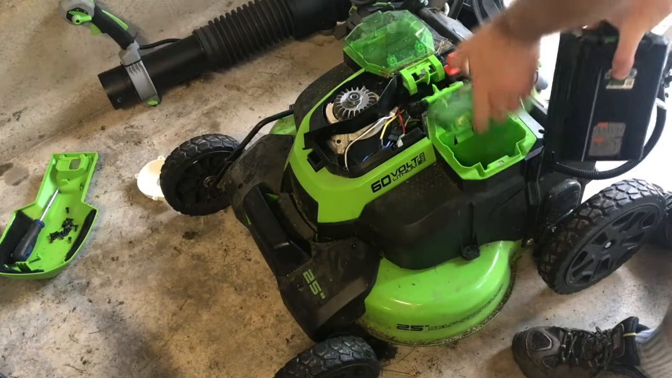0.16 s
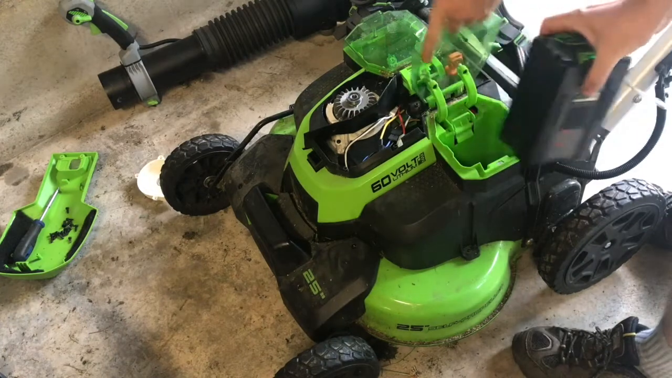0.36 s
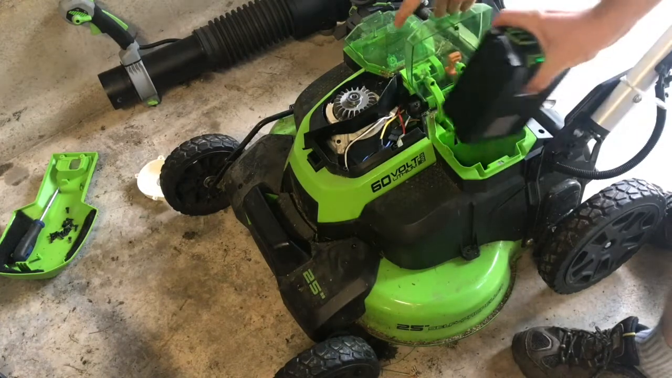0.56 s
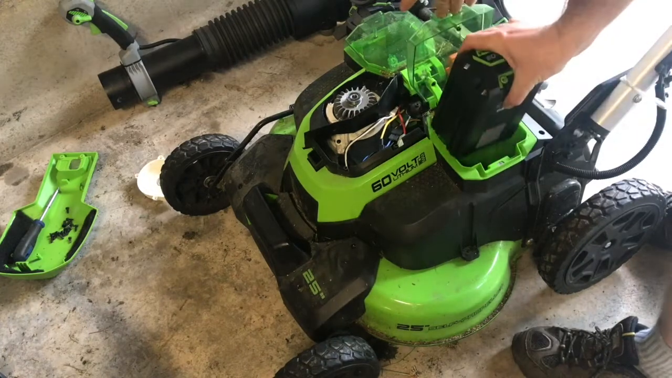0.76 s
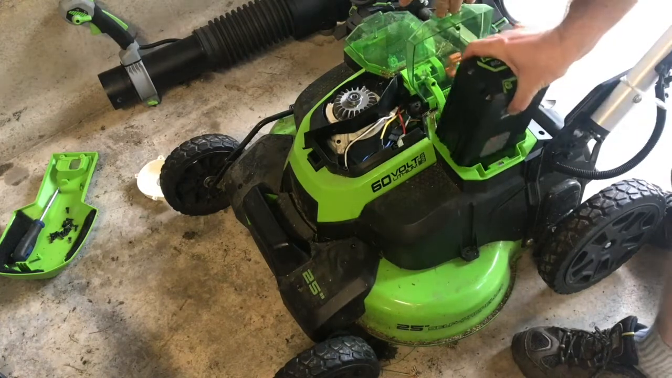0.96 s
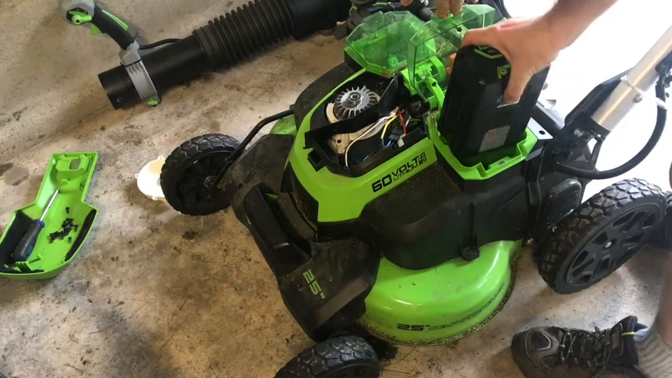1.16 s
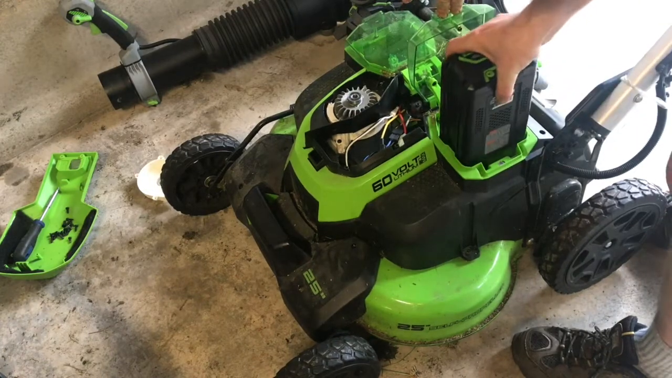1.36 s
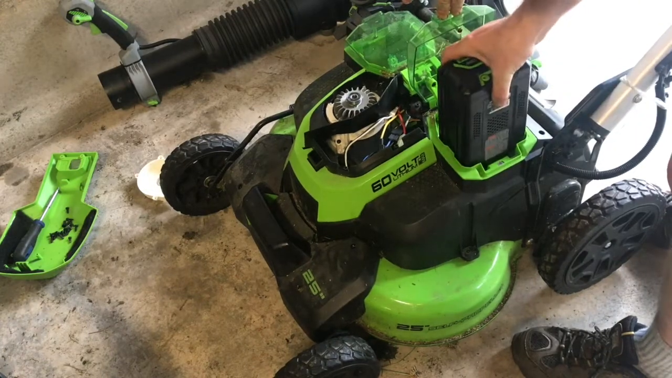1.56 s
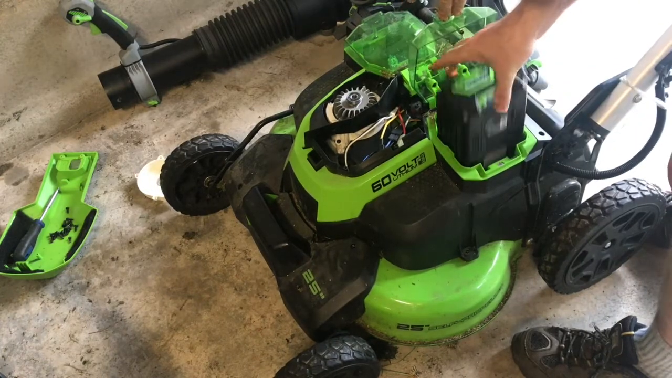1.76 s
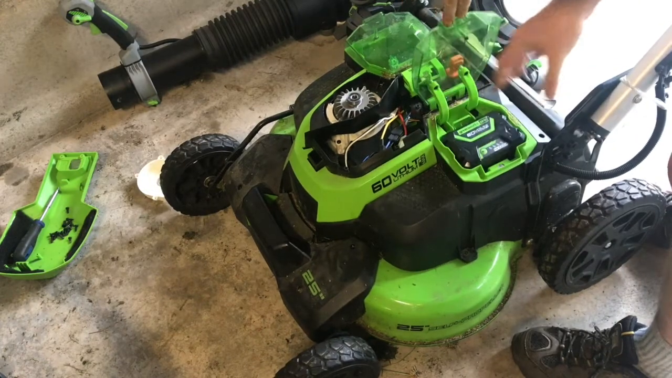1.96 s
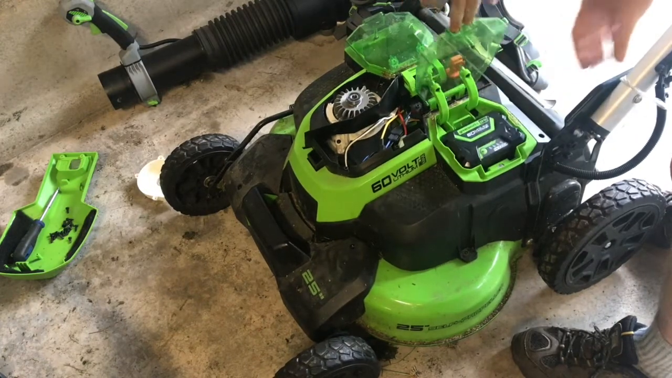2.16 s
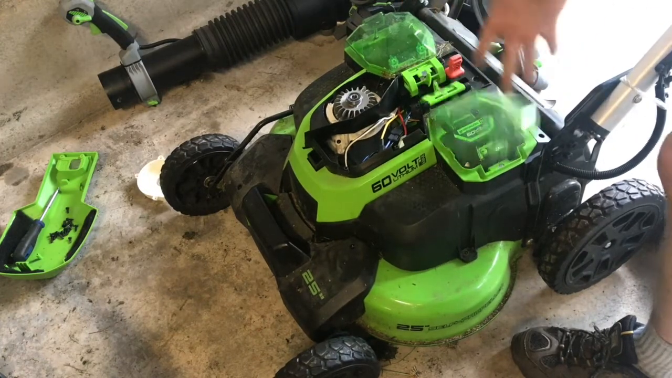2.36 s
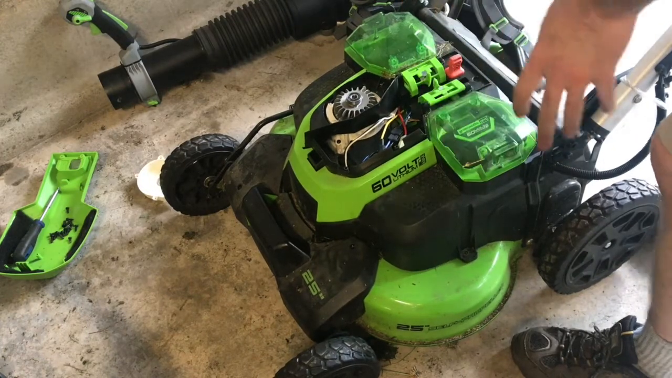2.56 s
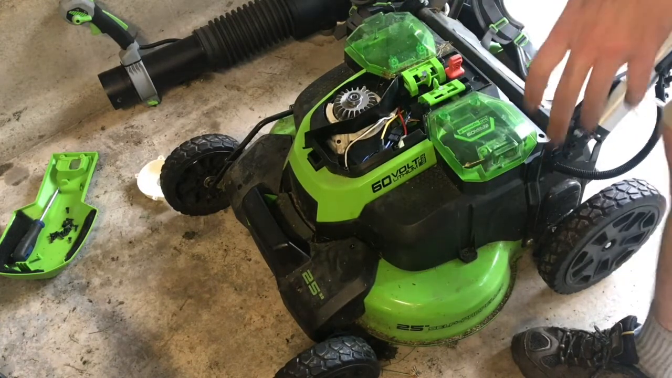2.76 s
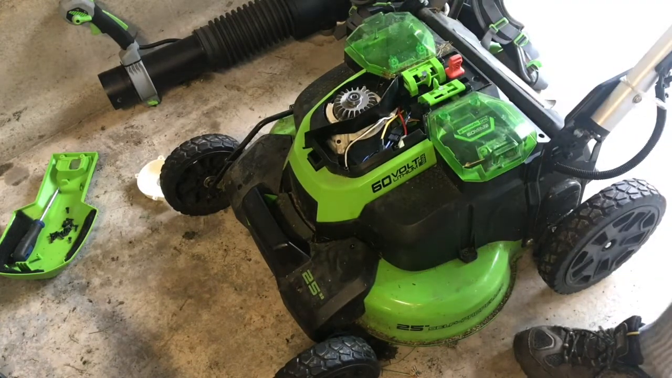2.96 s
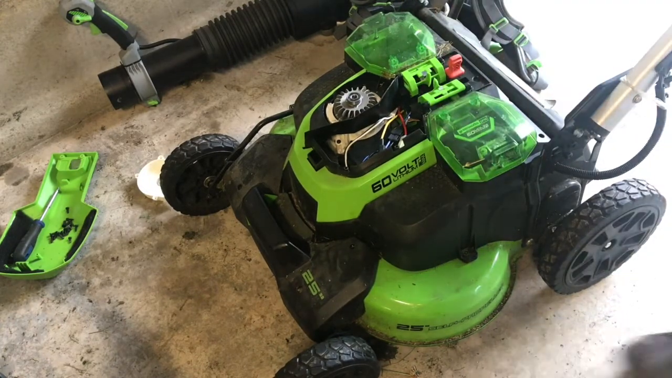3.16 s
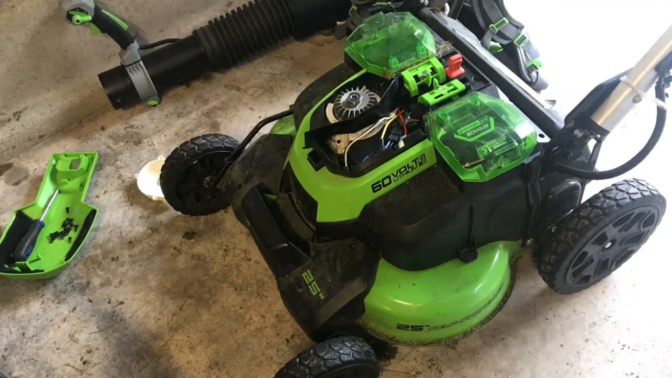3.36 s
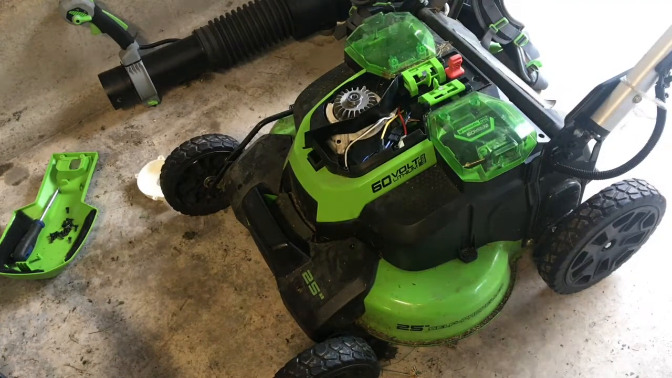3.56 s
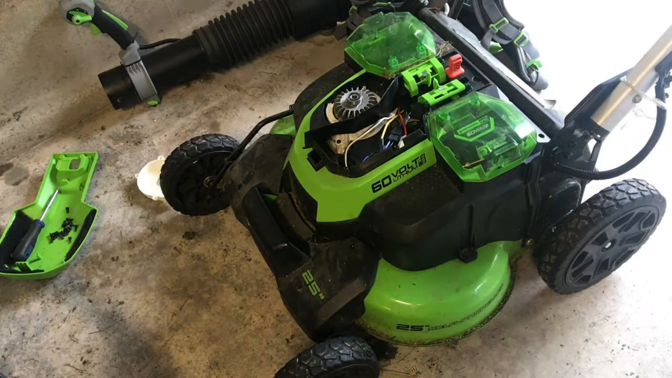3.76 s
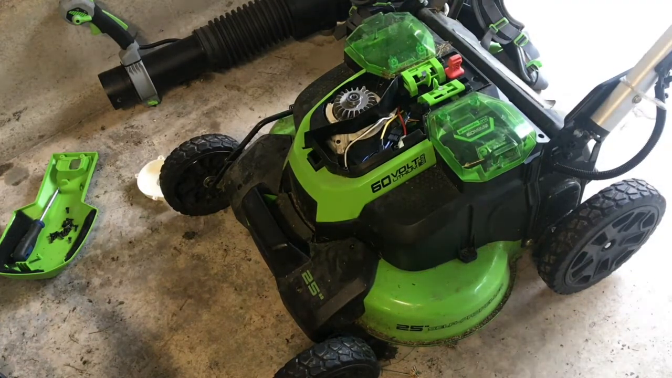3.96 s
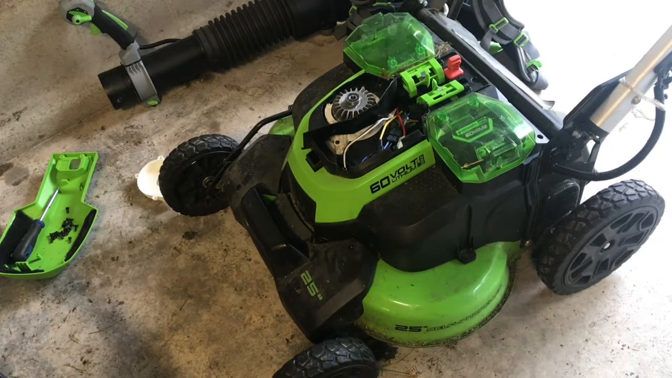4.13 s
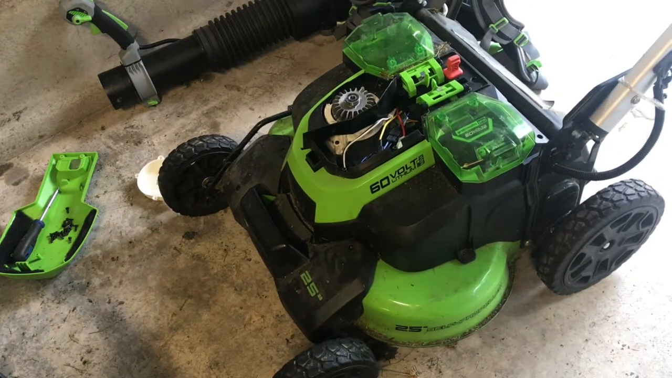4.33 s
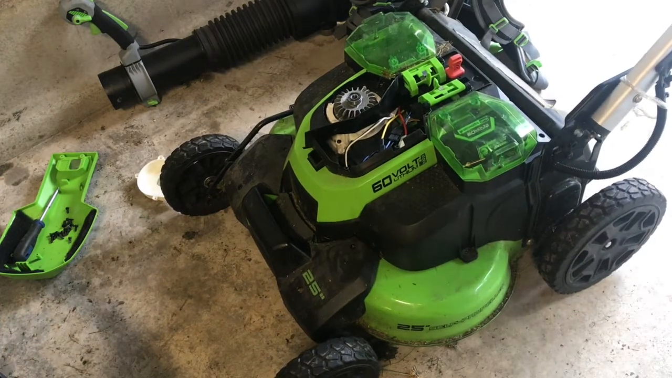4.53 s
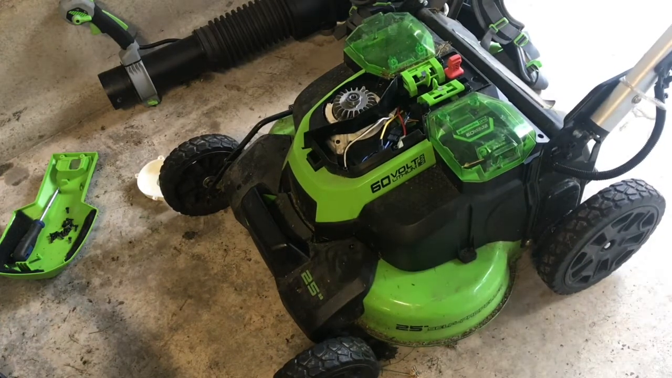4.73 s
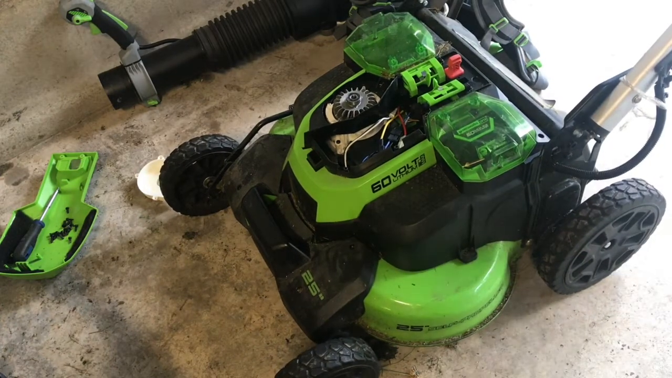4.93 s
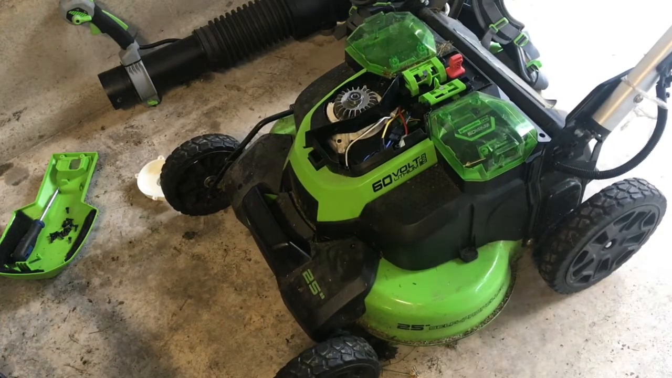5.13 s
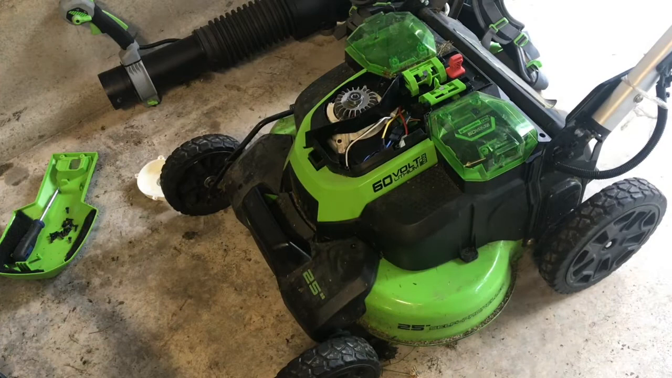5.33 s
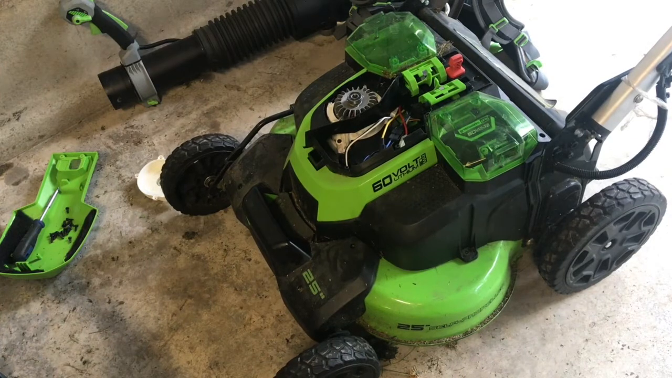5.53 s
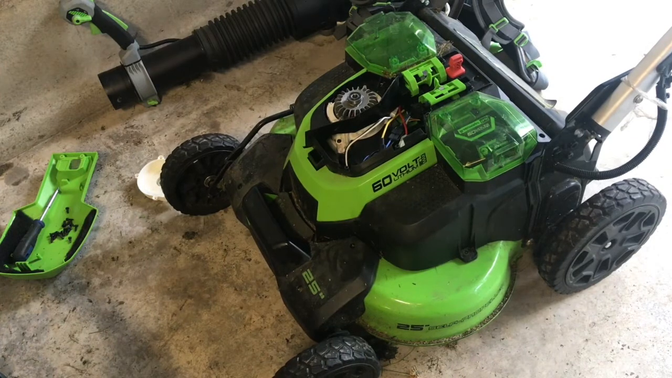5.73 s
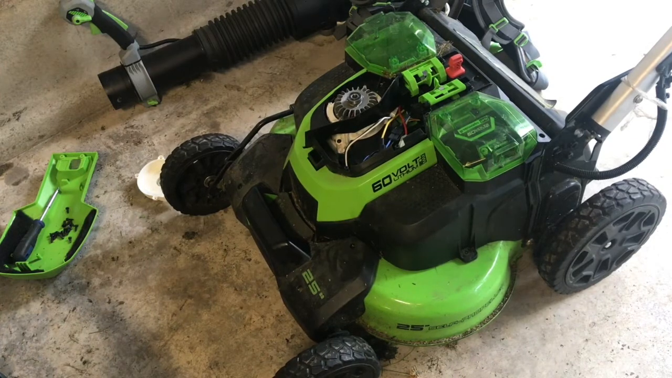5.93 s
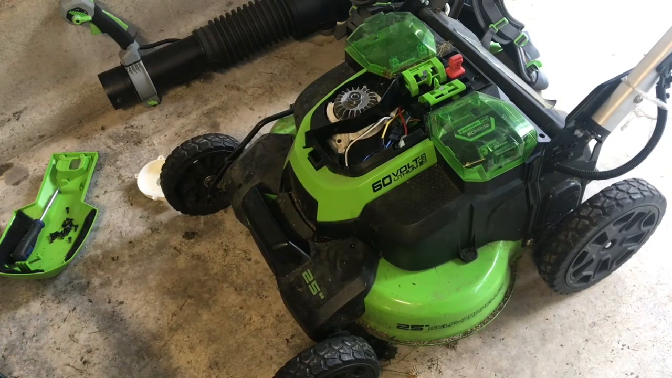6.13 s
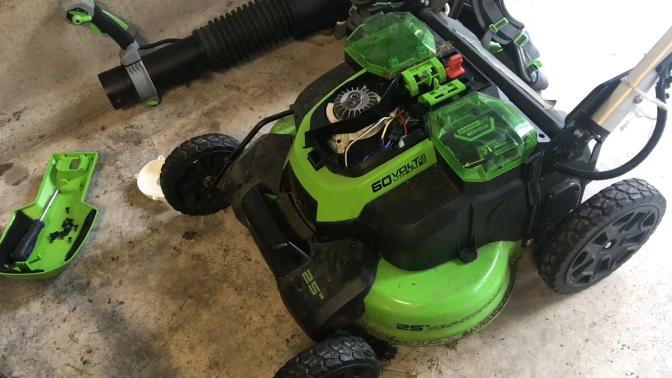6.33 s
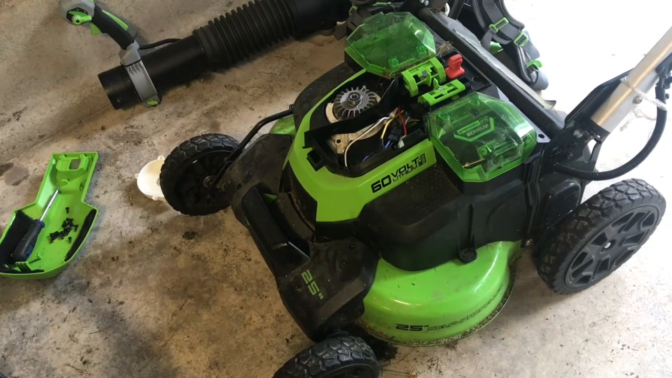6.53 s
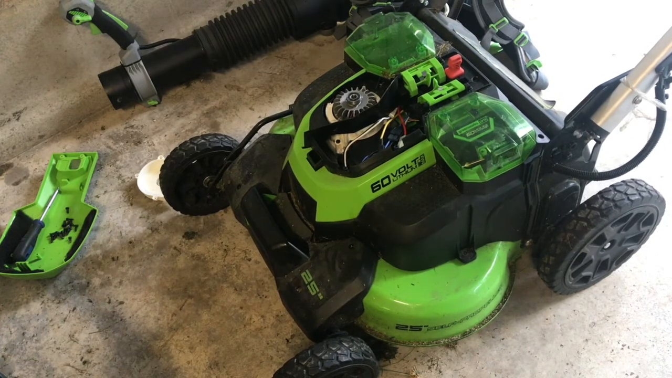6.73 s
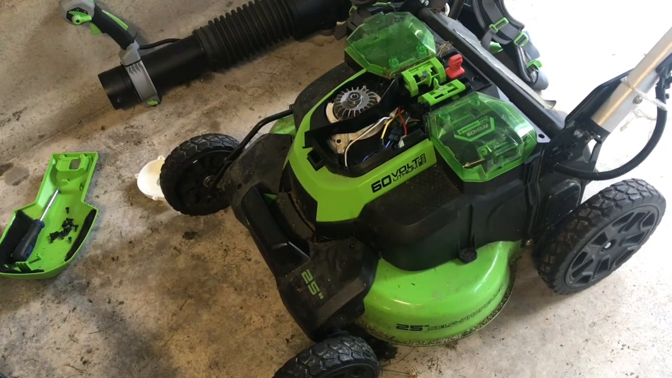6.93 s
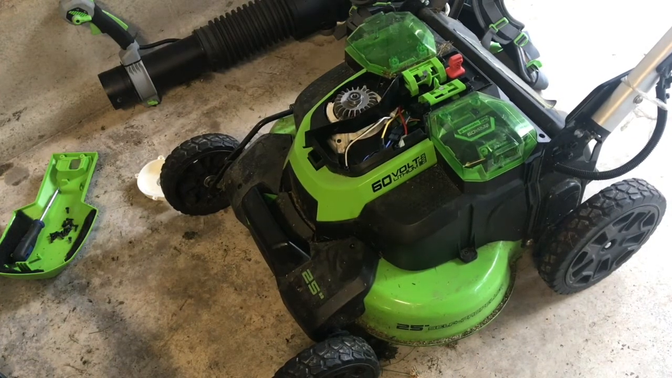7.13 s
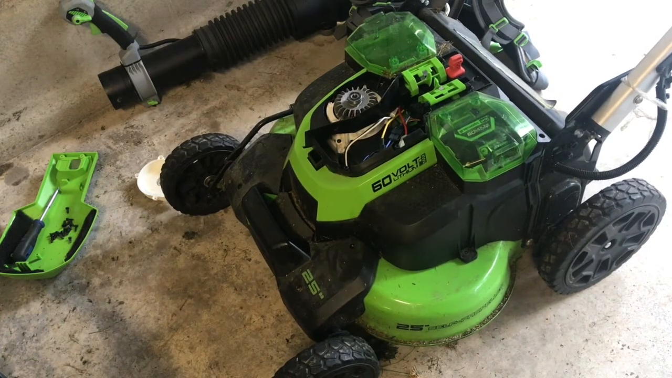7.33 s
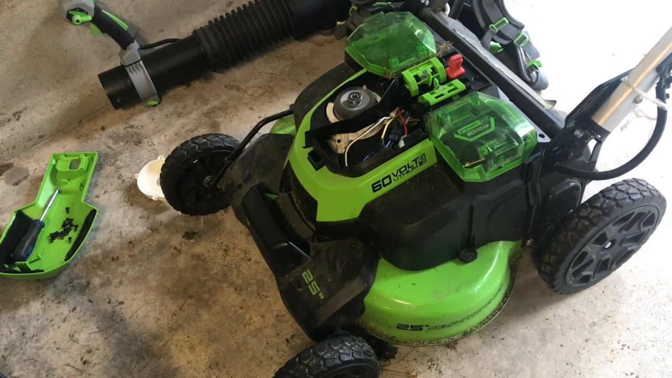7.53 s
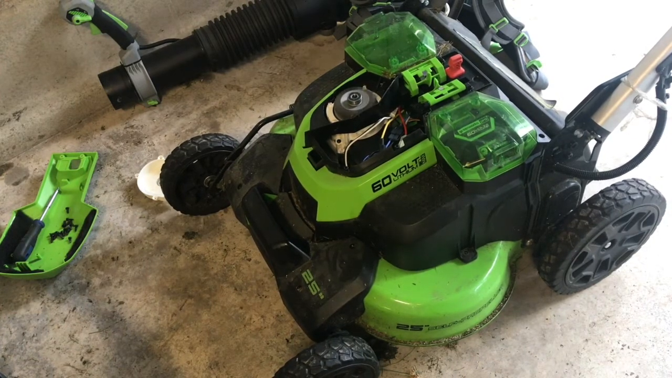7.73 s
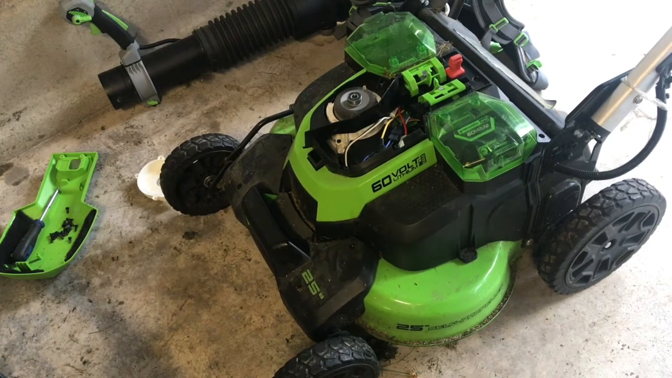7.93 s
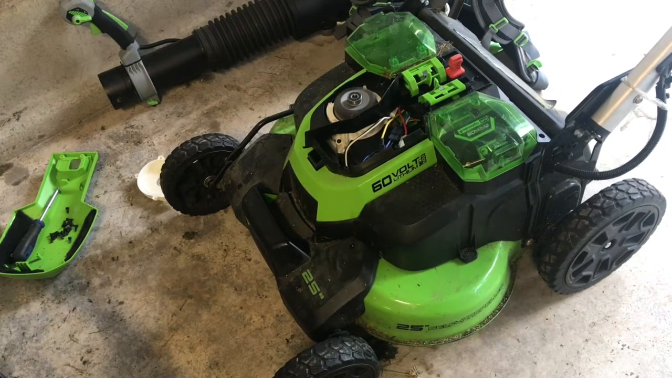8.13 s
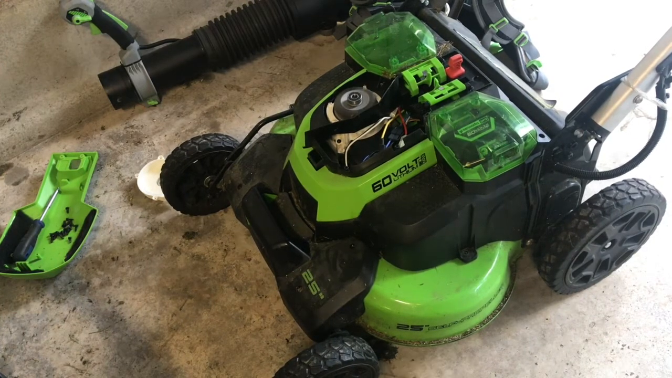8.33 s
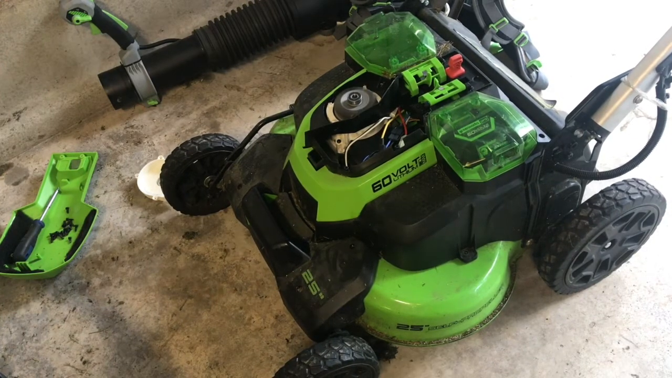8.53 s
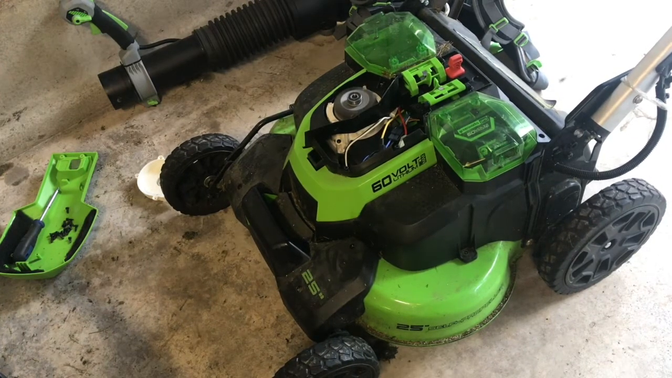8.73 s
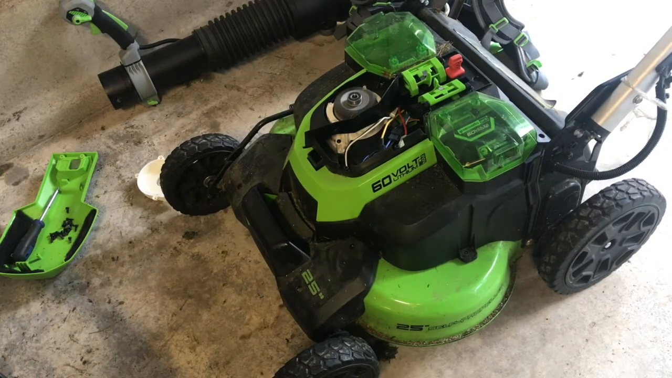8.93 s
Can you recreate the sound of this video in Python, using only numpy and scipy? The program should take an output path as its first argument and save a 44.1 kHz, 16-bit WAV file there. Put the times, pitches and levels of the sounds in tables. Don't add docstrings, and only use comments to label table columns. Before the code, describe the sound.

Close to a cordless mower in a concrete shed, a shoe scrapes grit over faint outdoor rumble. A battery knocks and slides into its plastic bay with hard clacks, then the lid slams. Scuffs and handle clicks follow. The background abruptly becomes quieter, and the motor starts, its loose blade clanking on the deck as roar and hum rise.

```python
import sys
import numpy as np
from scipy import signal
from scipy.fft import rfft, irfft, next_fast_len
from scipy.io import wavfile
from scipy.ndimage import uniform_filter1d

SR = 44100
rng = np.random.default_rng(int(sys.argv[2]) if len(sys.argv) > 2 else 0)


def bounce(signal):
    frames = np.transpose(np.atleast_2d(signal))
    limited = np.clip(frames, -1, 1)
    pcm = np.round(limited * 32767).astype(np.int16)
    wavfile.write(sys.argv[1], SR, pcm)


def ratio_of_db(decibels):
    return 10 ** (np.asarray(decibels, float) / 20)


N = 400869
T = np.arange(N) / SR
LONG = next_fast_len(N)
CHANGE_S, CHANGE_DB = 6.888, -21
TOP_SPEED = 74.5
HEARD_S = 7.74
# pitch in Hz, width in Hz, level in dB over the direct sound.
DECK = [(158, 7.4, 6), (204.5, 10.4, 9), (240.2, 8.9, 11.5), (318.5, 7.6, 10.5), (525, 86, 7.5),
        (641, 44, 0.5), (900, 160, 5.5), (1155, 102, 5.5), (1748, 75, 4), (2120, 54, 0), (3417, 100, 5.5),
        (3860, 110, 4.5), (4460, 40, 8), (6470, 950, -8), (7200, 900, -14.5)]


def evened(x):
    return x / np.sqrt(np.mean(x ** 2) + 1e-20)


def read(points, hz):
    f, value = np.transpose(points)
    return np.interp(np.log(hz + 1), np.log(f + 1), value)


def curves(rows):
    s, *columns = np.transpose(rows)
    gate = uniform_filter1d(1. * ((T > s[0]) & (T < s[-1])), size=400)
    return gate, *(np.interp(T, s, c) for c in columns)


def add(mix, s, sound):
    part = mix[round(s * SR):][:len(sound)]
    part += sound[:len(part)]


def filtered(x, points):
    return irfft(rfft(x, LONG) * ratio_of_db(read(points, np.fft.rfftfreq(LONG, 1 / SR))), LONG)[..., :N]


def coloured(x, points):
    return evened(filtered(x, points))


def resonate(x, hz, width):
    turn = np.exp(2j * np.pi * np.cumsum(hz) / SR)
    r = np.exp(-np.pi * width / SR)
    return 2 * (turn * signal.lfilter([1 - r], [1, -r], x / turn)).real


def body(modes, hz):
    return 1 + sum(ratio_of_db(db) / (1 + 2j * (hz - f) / max(w, 10)) for f, w, db in modes)


def tone(start, end, hz, db, waver_hz, waver_db):
    swell_s, fade_s = 0.11, 0.055
    t = np.arange(0, end - start, 1 / SR)
    drift = [evened(uniform_filter1d(v, size=3000)) for v in rng.standard_normal((2, len(t)))]
    shape = np.clip(np.minimum(t / swell_s, (t[-1] - t) / fade_s), 0, 1)
    level = np.sqrt(2) * shape * ratio_of_db(db + waver_db * drift[0])
    out = np.zeros(N)
    add(out, start, level * np.sin(2 * np.pi * np.cumsum(hz + waver_hz * drift[1]) / SR))
    return out


def knocks(rows, modes, body_db, thud_stretch, wet_db, dull_hz, scatter):
    # time to fall 60 dB, in seconds, for crack, thud, body and fizz.
    shed_t60 = [0.5, 0.6, 0.78, 0.41]
    body_share = 0.51
    size, out = 22050, np.zeros(N)
    t, hz = np.arange(size) / SR, np.fft.rfftfreq(size, 1 / SR)
    edges = [(2500, 7000), (170, 800), (800, 2500), (7000, 15500)]  # crack, thud, body, fizz in Hz
    filters = [signal.butter(2, e, "band", fs=SR, output="sos") for e in edges]
    bands = [signal.sosfreqz(f, hz, fs=SR)[1] for f in filters]
    slows = (1, thud_stretch, 1.2, .8)
    fade = np.clip((t[-1] - t) / .04 - .2, 0, 1)
    tails = [ratio_of_db(wet_db - 60 * t / t60) * (1 - np.exp(-t / 0.0041)) * fade for t60 in shed_t60]
    first_contact = 1.2 * np.exp(-t / 0.0012)
    for s, blow_db, weight_db, edge_db, t60 in rows:
        levels = blow_db + np.array([0, weight_db, body_db + body_share * weight_db, edge_db])
        puffs = rng.standard_normal((4, size))
        grip = 1 + scatter * puffs[0, -1]
        colour = body(modes, hz * grip) / (1 + 1j * hz / dull_hz)
        for db, band, slow, tail, puff in zip(levels, bands, slows, tails, puffs):
            onset = 1 - np.exp(-t / (0.00053 * slow ** 2))
            shape = (ratio_of_db(-60 * t / (t60 * slow)) + first_contact) * onset
            ring = irfft(rfft(puff * (shape + tail)) * band * colour)
            loudest = np.sqrt(uniform_filter1d(ring[:4096] ** 2, size=200).max())
            add(out, s, ratio_of_db(db) * ring / loudest)
    return out


def scuffs():
    # start, firmest and end in seconds, rub level in dB, gap pitch in Hz.
    drags = [(0, -0.006, 0.081, -57.5, 2480), (0.075, 0.12, 0.32, -60, 3120), (.31, 0.324, 0.38, -63, 2650),
             (.66, 0.7, 0.77, -50, 2900), (1.33, 1.358, 1.37, -55, 2270), (1.616, 1.662, 1.67, -44, 2300),
             (1.67, 1.72, 1.87, -31, 2600), (2.759, 2.789, 2.85, -50, 2876), (2.84, 2.995, 3.03, -54, 3100),
             (2.97, 3.128, 3.39, -63, 2790), (3.28, 3.335, 3.337, -39.5, 4200),
             (3.33, 3.4, 3.7, -59.5, 3000), (3.731, 3.766, 3.86, -46, 2760),
             (3.84, 3.88, 4.16, -54.5, 2600), (4.028, 4.105, 4.24, -34.5, 2500),
             (4.09, 4.278, 4.313, -32, 3230), (4.365, 4.407, 4.77, -58.5, 2800),
             (4.84, 4.93, 5.04, -51.5, 3500), (5.195, 5.233, 5.28, -51.5, 3350),
             (5.285, 5.327, 5.37, -45, 2900), (5.358, 5.403, 5.58, -67, 3000),
             (6.72, 6.767, 6.75, -50, 3200)]
    # pitch in Hz, level in dB per Hz.
    grit = [(300, -33), (900, -9.5), (1500, -10.5), (2200, -6.5), (4000, -7.5), (7000, -9), (12000, -30)]
    touch_db, lift_db, ease = -21.5, -19, 1.5
    treble_db, treble_slope = -8, -.25
    wet_db, tail_t60 = -7.5, 0.38
    sizes = ratio_of_db(2.0 * np.minimum(rng.exponential(1, N), 5))
    grains = rng.standard_normal(N) * sizes * (rng.random(N) < 6000 / SR)
    rub = coloured(grains, grit)
    fizz = evened(signal.sosfilt(signal.butter(2, 7000, "high", fs=SR, output="sos"), grains))
    out = np.zeros(N)
    for start, firm, end, db, hz in drags:
        part = slice(max(round(start * SR), 0), round(end * SR))
        t = T[part]
        gap_hz = hz + 0 * t
        rise = np.clip((firm - t) / max(firm - start, 1e-3), 0, 1) ** ease
        fall = np.clip((t - firm) / max(end - firm, 1e-3), 0, 1) ** ease
        rub_db = db + touch_db * rise + lift_db * fall
        ringing = evened(rub[part] + .8 * evened(resonate(rub[part], gap_hz, 800)))
        treble = ratio_of_db(treble_db + treble_slope * (db + 48.5)) * fizz[part]
        out[part] += ratio_of_db(rub_db) * (ringing + treble)
    t = T[:20000]
    tail = uniform_filter1d(rng.standard_normal(len(t)), size=3) * ratio_of_db(-60 * t / tail_t60)
    return out + ratio_of_db(wet_db) * signal.oaconvolve(out, tail / np.linalg.norm(tail))[:N]


def outdoor_air():
    # pitch in Hz, level in dB per Hz.
    air_colour = [(20, -35), (35, -14), (55, -4.5), (140, -1.5), (175, -7), (450, -14), (650, -20.5),
                  (1000, -26.5), (2700, -38), (5000, -35.5), (8300, -40), (15400, -47)]
    # time in seconds, level in dB.
    air_level = [(0.0, -53), (0.55, -52), (0.8, -47), (1.64, -55), (1.85, -37.5), (2.0, -52), (3.09, -54.5),
                 (6.73, -50), (6.85, -47.5)]
    swell = evened(uniform_filter1d(rng.standard_normal(N), size=6000))
    return ratio_of_db(curves(air_level)[1] + 1.0 * swell) * coloured(rng.standard_normal(N), air_colour)


def bumps():
    # start in seconds, level in dB, pitch in Hz, time to fall 60 dB in seconds.
    bumps_and_squeaks = [(.155, -54, 13600, .08), (.69, -46, 13900, .14), (.705, -42, 6400, 0.13),
                         (.815, -55, 14000, .1), (.002, -46, 1040, 0.082), (.14, -48, 1045, 0.21),
                         (.69, -22, 310, 0.15), (.79, -14, 307, 0.083), (.8, -32.5, 153, 0.28),
                         (1.825, -28.5, 103.6, 0.4), (2.34, -27, 720, .68), (2.341, -32, 770, 0.5),
                         (2.771, -34, 976, 0.029), (3.29, -20.5, 142, 0.065), (3.737, -30.5, 1018, 0.024),
                         (3.985, -26, 800, 0.03), (4.176, -26.5, 800, 0.086), (4.693, -22.5, 191, 0.061),
                         (5.0445, -15, 3460, 0.012), (5.329, -33.5, 200, 0.066), (5.587, -56, 641, .05),
                         (6.187, -34, 620, 0.11)]
    rough = .7
    out, t = np.zeros(N), np.arange(24000) / SR
    for s, db, hz, t60 in bumps_and_squeaks:
        sag = min(hz, 1200) * 0.00035 * (1 - np.exp(-t / .005))
        phase = 2 * np.pi * (hz * t + sag)
        wobble = evened(uniform_filter1d(rng.standard_normal(len(t)), size=500))
        flutter = 1 + rough * np.minimum(t / .03, 1) * wobble
        add(out, s, flutter * ratio_of_db(db - 60 * t / t60) * (1 - np.exp(-t * hz / 1.5)) * np.sin(phase))
    return out


def battery_drop():
    # start in seconds, strength in dB, thud over
    # crack in dB, fizz over crack in dB, time for the contact to fall 60 dB in seconds.
    battery_hits = [(.1349, -50.5, 0.5, -2, 0.25), (.2071, -52, 7, -20, 0.045), (.3394, -59.5, -35, 1, .05),
                    (.6509, -30, 6.5, -0.5, .042), (.684, -42.5, 16.5, 1, 0.062),
                    (.7847, -35, 11.5, -2, 0.047), (.941, -55.5, 9, -8, 0.27),
                    (.9855, -33.5, 7.5, -4, 0.036), (1.1126, -52.5, 16.5, -4, 0.054),
                    (1.292, -49, 19.5, -8, 0.057), (1.313, -42.5, 15.5, -10.5, 0.028),
                    (1.3332, -47.5, 14, -14, 0.11), (1.5174, -64, 17.5, -10, 0.025),
                    (1.6026, -65.5, 24.5, 3, 0.37), (1.6674, -20.5, 9, -2.5, 0.066),
                    (1.7445, -35.5, 15.5, -12, .04), (1.8, -16.5, 0, -2, .05),
                    (1.8205, -9.5, -3, -0.5, 0.054), (1.8406, -22.5, -0.5, -11, 0.068),
                    (1.8861, -29, -2.5, -21, 0.087),
                    (1.659, -37, 16, -3.5, 0.039),
        (1.79, -21, -2.5, -3, .045),
        (1.809, -21, -7.5, -6, 0.033),
    ]
    # pitch in Hz, width in Hz, level in dB over the direct sound.
    bay = [(310, 5.2, 5.5), (383, 43, 3), (510, 17, 5), (586, 15, 3.5), (1350, 170, -9), (3730, 590, -1),
           (4460, 900, -3.5), (5970, 590, 2)]
    return knocks(battery_hits, bay, -4.0, 2.2, -20.0, 12000, .03)


def distant_tones():
    # start in seconds, end in seconds, pitch in Hz, level in dB.
    far_tones = [(.3, 0.676, 505.2, -58.5), (4.95, 5.62, 450, -61), (5.78, 7.4, 488, -57.5),
                 (3.4, 3.65, 500, -65), (4.95, 5.3, 564, -68)]
    return sum(tone(*row, waver_hz=1.9, waver_db=3.2) for row in far_tones)


def lid_slam():
    # start in seconds, strength in dB, thud over crack in dB, fizz over crack in dB,
    # time for the contact to fall 60 dB in seconds.
    lid_hits = [
        (2.308, -47, 3.5, -11, 0.11),
        (2.331, -6, -2.5, -9, 0.023),
        (2.337, -11.5, 4, -5.5, 0.069),
    ]
    # pitch in Hz, width in Hz, level in dB over the direct sound.
    cover = [(151, 20, 5.5), (307, 20, 7), (620, 47, 0.5), (720, 60, 4.1), (800, 90, 11), (1030, 81, 3.3)]
    return knocks(lid_hits, cover, -0.31, 1.5, -19.5, 20000, 0)


def handle_clicks():
    # start in seconds, strength in dB, thud over crack in dB, fizz
    # over crack in dB, time for the contact to fall 60 dB in seconds.
    handle_hits = [(2.7732, -60, 17.5, -4, .014), (3.2884, -37.5, -9.5, 1.5, .16),
                   (3.691, -69, 11.5, -7, .025), (3.7349, -55.5, 9.5, 5.5, 0.036),
                   (3.8916, -24.5, -39, -7, .063), (3.9848, -60.5, 22, 6, 0.039),
                   (4.1749, -22.5, -13, -40, 0.012), (4.646, -32, -12.5, 3, 0.053),
                   (4.6932, -43, 5, 0, 0.047), (4.931, -51, -18, -13, 0.05),
                   (5.0438, -25, -17, -5.5, 0.078), (5.3547, -62.5, 11.5, -2, .019),
                   (5.5856, -57.5, 13, -1, 0.024), (6.112, -34.5, -16.5, -3.5, 0.058),
                   (6.1864, -48.5, 8, -16, 0.1), (6.3101, -64, 12, -7, .035), (6.413, -54, 4.5, -5, 0.13),
                   (6.4601, -25.5, -38, -5, 0.076), (6.7703, -34, -11.5, 2.5, 0.074),
                   (3.866, -50.5, 3, 4.5, .081), (4.634, -50.5, -1, -2.5, .058),
                    (5.245, -54, 1, -14, 0.02), (6.744, -48, -8, -18, 0.16)]
    # pitch in Hz, width in Hz, level in dB over the direct sound.
    bar = [(1437, 15, 1.15), (2170, 67, 1.6), (3330, 200, 2.04), (4180, 430, 10), (5820, 340, 2.5),
           (6600, 1030, 1.9), (8720, 590, 1.5)]
    return knocks(handle_hits, bar, 0.9, 2.33, -14.0, 15000, 0.031)


def insect():
    # time in seconds, level in dB.
    buzz = [(5.3, -83), (5.45, -73.5), (5.95, -77), (6.1, -94.5)]
    hz, width = 4500, 330
    band = [(hz - 2 * width, -40), (hz, 0), (hz + 2 * width, -40)]
    return ratio_of_db(curves(buzz)[1]) * coloured(rng.standard_normal(N), band)


def quiet_air():
    # pitch in Hz, level in dB per Hz.
    quiet_colour = [(15, -48), (25, -25), (49, -5), (104, -9), (136, 1.5), (173, -9.5), (494, -19),
                    (682, -33), (868, -32), (1300, -41), (15400, -50)]
    return ratio_of_db(-64.5) * coloured(rng.standard_normal(N), quiet_colour)


def loose_blade():
    # start in seconds, strength in dB, thud over crack in dB, fizz over crack in dB,
    # time for the contact to fall 60 dB in seconds.
    slack_hits = [(7.264, -59, -11.5, 0, 0.061), (7.3262, -80, 8, 4, .11), (7.3522, -54.5, 4, -24, .1),
                  (7.3794, -76, 31.5, 1, 0.075), (7.429, -72, 30, 5, .043), (7.4644, -48.5, 8, -15, 0.057),
                  (7.5079, -48.5, 4, -13, 0.033), (7.5255, -40.5, 6.5, -24, 0.15),
                  (7.6195, -28.5, -3.5, -10, 0.071), (7.6635, -35, -3, -18, 0.095),
                  (7.6822, -30, -8, -7, 0.066), (7.7363, -33, -17, -11, 0.051),
                  (7.7767, -29, -25, -9, 0.039), (7.8194, -30, -4.5, -10, 0.1)]
    # start in seconds, level in dB.
    hard_blows = [(7.9572, -18), (7.9875, -19.5), (8.0714, -20.5), (8.0952, -19), (8.1452, -19),
                  (8.194, -17), (8.238, -23), (8.3061, -20), (8.3673, -30), (8.448, -34), (8.4858, -20.5),
                  (8.5264, -19), (8.5936, -20), (8.7013, -21), (8.739, -21), (8.803, -18.5),
                  (8.8379, -15.5), (8.9982, -26)]
    clanks = [(s, db - 10.5, -8.5, -8.4, .04) for s, db in hard_blows]
    return knocks([*slack_hits, *clanks], DECK, -0.48, 2.3, -13, 6500, 0.0096)


def relay():
    out, t = np.zeros(N), np.arange(3000) / SR
    rings = np.sin(2 * np.pi * 7400 * t) + np.sin(2 * np.pi * 8800 * t)
    add(out, 7.326, ratio_of_db(-70 - 60 * t / 0.082) * rings)
    return out


def controller_whine():
    # start in seconds, end in seconds, pitch in Hz, level in dB.
    switching = (7.35, 8, 12032, -71)
    return tone(*switching, waver_hz=24.7, waver_db=5.0)


def shaft_speed():
    start_s, spin_up_s, creep_speed = 7.493, .84, 23
    speed = TOP_SPEED * (1 - np.exp(-np.maximum(T - start_s, .01) / spin_up_s))
    return (speed ** 8 + creep_speed ** 8) ** (1 / 8)


def deck_roar(turns, gate):
    # time in seconds, level in dB.
    drive = [(7.33, -80), (7.388, -48), (7.41, -56), (7.52, -44.5), (7.53, -34.5), (7.66, -42.5),
             (7.7, -33), (8.3, -30), (9.09, -31.5)]
    # pitch in Hz, level in dB per Hz.
    mower_colour = [(90, -68), (140, -30.5), (350, -21), (700, -13.5), (1400, -15), (2800, -14.5),
                    (5000, -20), (7200, -22), (10500, -29.5), (15500, -33)]
    rattle_full_db, rattle_slope = -32, 1.38
    running, air_db = curves(drive)
    rattle_db = rattle_full_db + rattle_slope * (air_db - air_db.max())
    force = ratio_of_db(2.5 * rng.standard_normal(500))[turns.astype(int)]
    beat = .5 + gate * force * np.exp(-(turns % 1) / .45)
    hz = np.fft.rfftfreq(LONG, 1 / SR)
    deck = body(DECK, hz) * ratio_of_db(read(mower_colour, hz))
    low = 1 / (1 + (hz / 1500) ** 4)
    air, rattle = rng.standard_normal((2, N))
    crackle = ratio_of_db(2.0 * np.minimum(rng.exponential(1, N), 3)) * (rng.random(N) < 2500 / SR)
    rattle = rattle * (.6 + crackle)
    air = irfft(rfft(air * (2.5 + beat), LONG) * deck * np.sqrt(low), LONG)[:N]
    rattle = irfft(rfft(rattle * beat, LONG) * deck * np.sqrt(1 - low), LONG)[:N]
    full = T > HEARD_S
    noise = ratio_of_db(air_db) * air / air[full].std() + ratio_of_db(rattle_db) * rattle / rattle[full].std()
    return running * noise


def shaft_hum(speed, turns, gate):
    # waves per shaft turn, level in dB.
    hum_orders = [(2, 2.5), (3, -6), (4, -4), (6, -14), (8, -5)]
    hum_full_db, hum_slope = -41, 65
    shake_full_db, shake_slope = -58, 115
    boom_speed, boom_width, boom_db = 51.5, 6.0, 9
    width = np.where(speed < boom_speed, boom_width, .3 * boom_width)
    boom = boom_db * np.exp(-((speed - boom_speed) / width) ** 2)
    hum_db = hum_full_db + hum_slope * np.log10(speed / TOP_SPEED) + boom
    hum = sum(ratio_of_db(db) * np.cos(2 * np.pi * (k * turns + rng.random())) for k, db in hum_orders)
    shake_db = shake_full_db + shake_slope * np.log10(speed / speed[-1])
    shake = ratio_of_db(shake_db) * np.cos(2 * np.pi * turns)
    return np.sqrt(2) * gate * (ratio_of_db(hum_db) * hum + shake)


def mower():
    speed = shaft_speed()
    turns = np.cumsum(speed) / SR + 0.27
    gate = np.clip((T - HEARD_S) / .01, 0, 1)
    return controller_whine() + deck_roar(turns, gate) + shaft_hum(speed, turns, gate)


def scene():
    before = np.clip((CHANGE_S - T) / 0.006, 0, 1)
    gain = before + (1 - before) * ratio_of_db(CHANGE_DB)
    handling = scuffs() + bumps() + battery_drop() + lid_slam() + handle_clicks()
    background = before * (outdoor_air() + insect()) + (1 - before) * quiet_air()
    motor_start = loose_blade() + relay() + mower()
    return (gain * (handling + distant_tones()) + background + motor_start)[None]


def low_pass(x):
    return signal.sosfilt(signal.butter(12, 16970, fs=SR, output="sos"), x)


def record(dry):
    # pitch in Hz, level in dB.
    mic_port = [(6500, 0), (7700, -1), (8700, 0.5), (9700, -1), (10600, -3.5), (11600, -0.5)]
    heard = filtered(dry, mic_port)
    soft = np.tanh(heard / 1.37) * 1.022
    mix = signal.oaconvolve(soft, signal.firwin(255, 15900, fs=SR)[None], "same")
    return low_pass(mix)


dry = scene()
out = record(dry)
bounce(out)
```